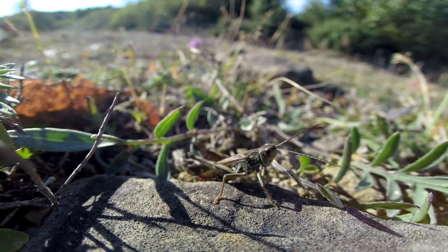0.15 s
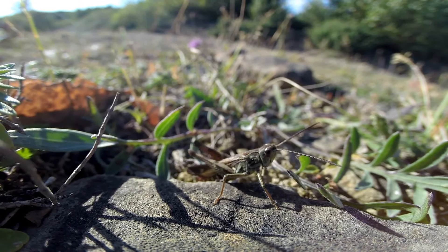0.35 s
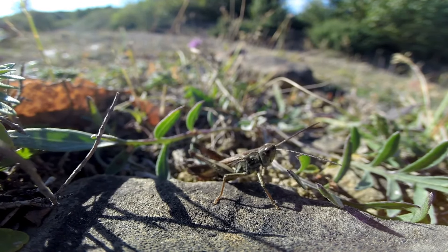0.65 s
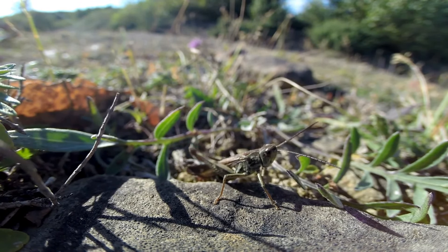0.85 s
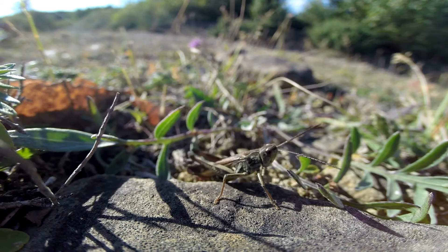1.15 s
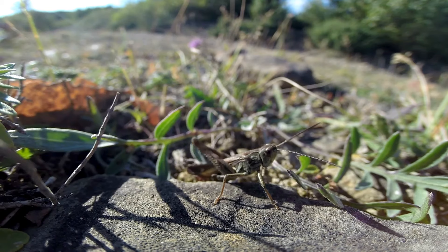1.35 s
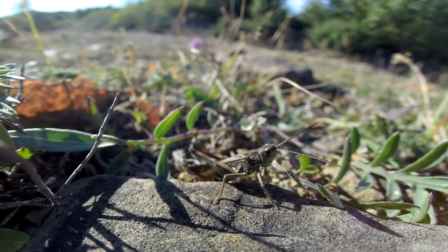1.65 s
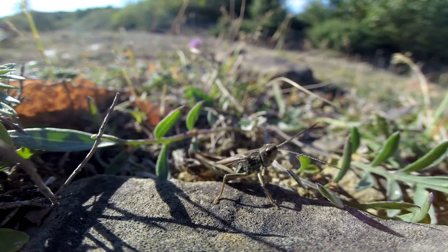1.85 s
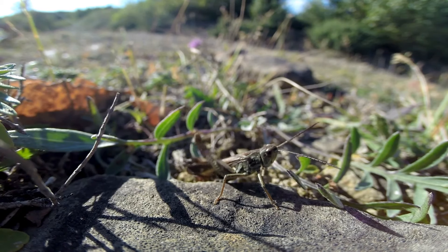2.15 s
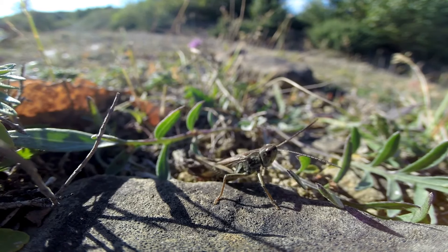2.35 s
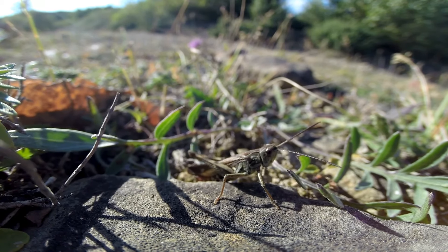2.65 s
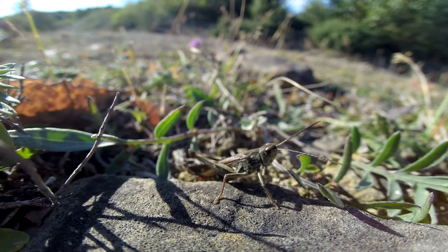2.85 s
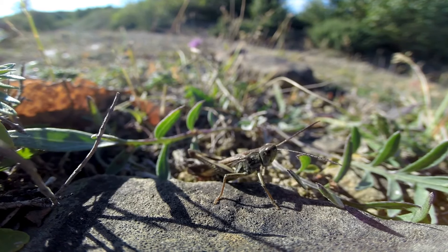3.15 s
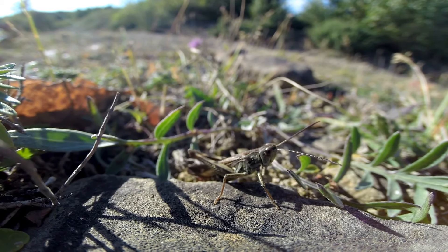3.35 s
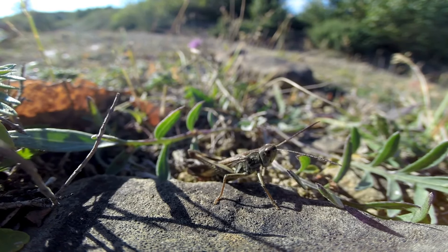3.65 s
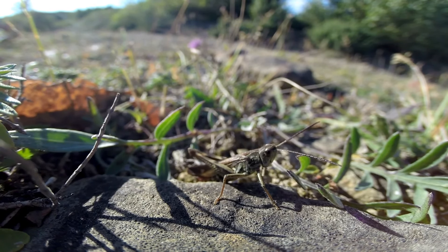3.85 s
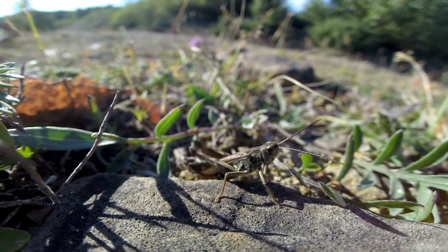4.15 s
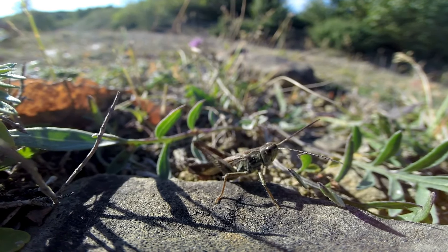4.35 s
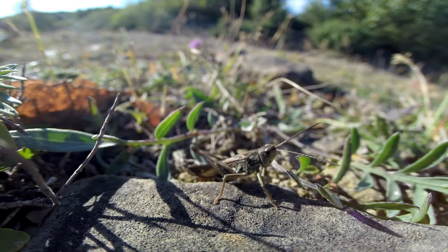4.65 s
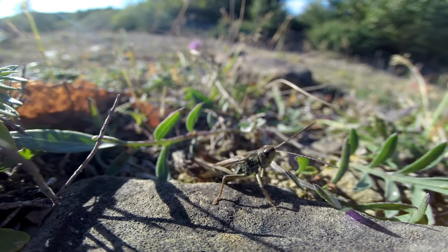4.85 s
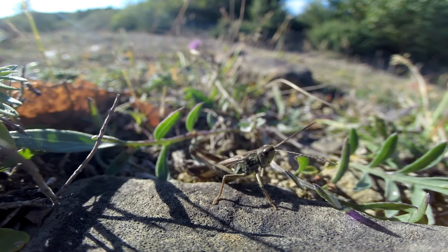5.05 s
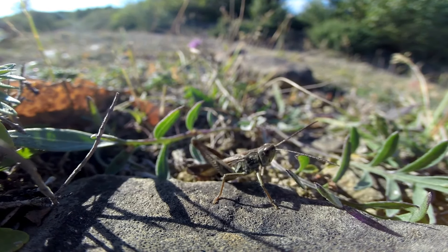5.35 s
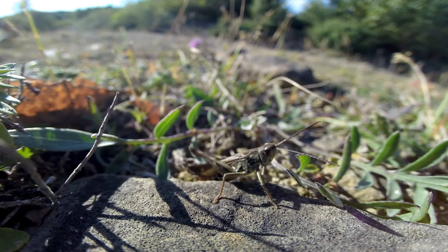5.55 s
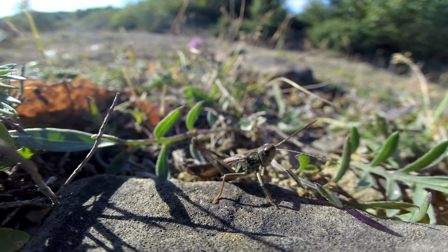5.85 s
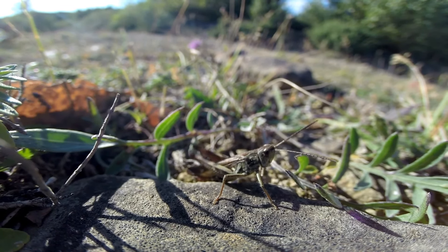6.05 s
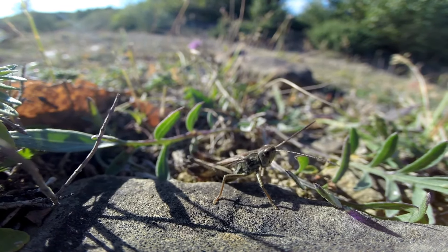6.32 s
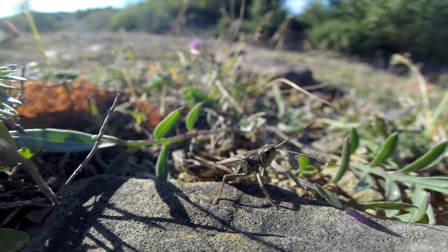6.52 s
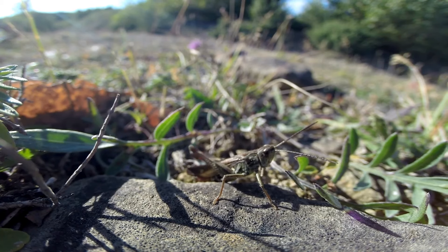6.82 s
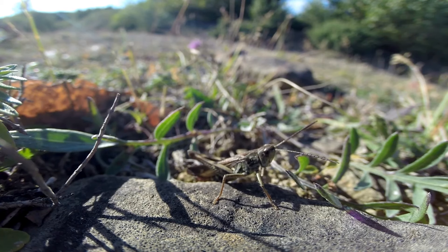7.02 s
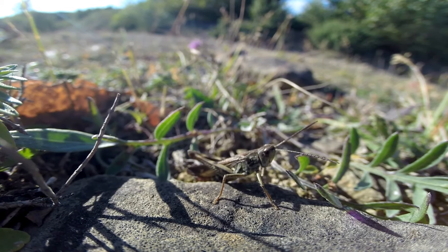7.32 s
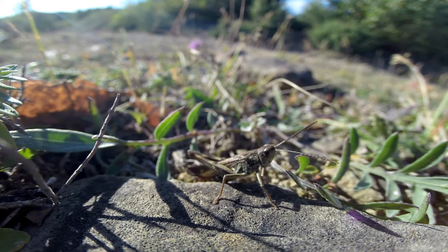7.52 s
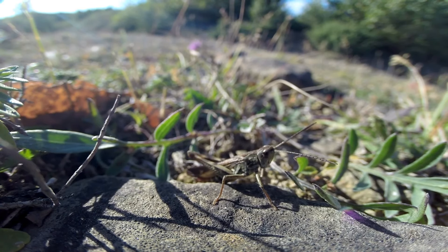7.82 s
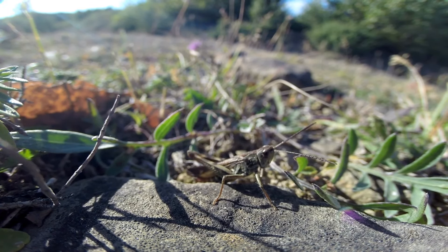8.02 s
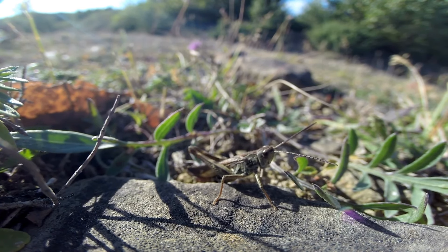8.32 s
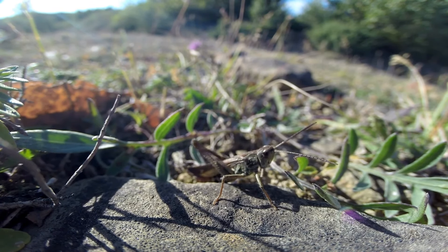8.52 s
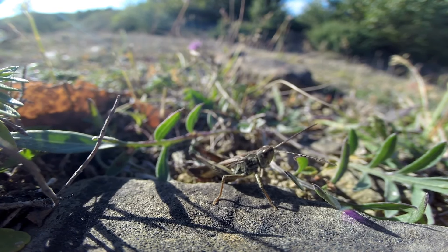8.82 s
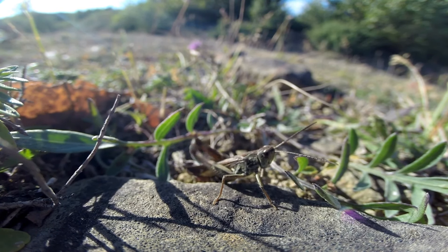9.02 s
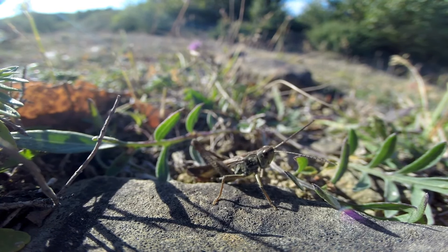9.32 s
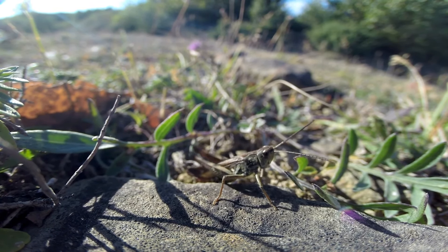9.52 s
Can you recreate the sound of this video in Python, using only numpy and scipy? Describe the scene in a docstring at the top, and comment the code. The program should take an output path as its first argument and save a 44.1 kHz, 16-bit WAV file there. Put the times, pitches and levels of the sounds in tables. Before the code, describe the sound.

Close, dry insect stridulation: fast pulsing chirr that rises from faint ticking to bright buzz, stops, and repeats over a very soft outdoor rush.

```python
"""A grasshopper sings three swelling bouts of about 11 leg strokes a second, by stridulation: the pegs of both
hind legs click over the wing veins, up to thousands of times a second, and each click rings the wing.
Each stroke is a jerk, a shiver and a slow ticking glide. Around it lies the soft rush of an open hillside,
made of filtered noise, and a far bird gives thin rising whistles, made of frequency-modulated sines."""
import sys
import numpy as np
from scipy import signal
from scipy.fft import rfft, irfft
from scipy.io import wavfile

SR = 44100
rng = np.random.default_rng(int(sys.argv[2]) if len(sys.argv) > 2 else 0)


def dump(signal):
    """Clip the signal to [-1, 1] and save it as 16-bit WAV at the path in sys.argv[1]."""
    limited = np.clip(np.atleast_2d(signal).T, -1, 1)
    pcm = np.round(limited * 32767).astype(np.int16)
    wavfile.write(sys.argv[1], SR, pcm)


N = 426886  # length in samples


def undb(db):
    """A decibel is a twentieth of a decade of amplitude."""
    return 10 ** (np.asarray(db) / 20)


def level(x, db):
    """Scale a sound to a root-mean-square level."""
    rms = np.sqrt(np.mean(x ** 2) + 1e-20)
    return x * undb(db) / rms


def along(at, table):
    """Linear interpolation of every further column of a table over its first."""
    first, *columns = np.transpose(table)
    return [np.interp(at, first, column) for column in columns]


def walk(n, rate):
    """Band-limited chance: random points, `rate` a second, joined by lines, with a spread near 1."""
    at = np.arange(n) / SR * rate
    count = int(at[-1]) + 2
    return 1.2 * np.interp(at, np.arange(count), rng.standard_normal(count))


def response(points, size):
    """Gain at each Fourier bin of a (frequency_hz, level_db) spectrum, interpolated over log frequency."""
    hz, db = np.transpose(points)
    bin_hz = np.arange(size // 2 + 1) * SR / size
    return undb(np.interp(np.log(bin_hz + 1), np.log(hz), db))


def ring(points, size=256):
    """Minimum-phase impulse response: folding the cepstrum makes the ring causal."""
    cepstrum = irfft(np.log(response(points, size)))
    cepstrum[1:size // 2] *= 2
    cepstrum[size // 2 + 1:] = 0
    return irfft(np.exp(rfft(cepstrum)))


def strokes(start, end):
    """Rhythm of one bout as (start_s, stop_s, jerk_db, surge); a stroke lasts until the next or the bout's end."""
    # runs of evenly paced strokes, parted by a skip in the beat or a change of attack:
    # first_stroke_s, last_stroke_s, jerk_db (opening jerk over the shiver), surge (extra speed share in the jerk)
    runs = [(-.014, -.014, -6.5, 0.56), (.075, .15, 6.5, .55), (.219, .575, 8, .6), (.645, 1.002, 6, 0.62),
            (1.101, 1.804, 5.5, 0.66), (1.892, 2.158, 3.5, 1.05), (2.247, 2.518, 5.5, 1.1),
            (2.619, 2.619, 10, .7), (2.687, 2.861, 8, 0.69), (4.139, 4.138, 13, 0.45),
            (4.211, 4.724, 5, .75), (4.792, 4.792, 13, 0.64), (4.865, 5.287, 7.5, .6),
            (5.372, 6.05, 8, 0.57), (6.137, 6.4, 9, .8), (6.489, 6.76, 7, 0.79), (6.872, 6.872, 11, 0.81),
            (8.468, 8.468, 10, 0.46), (8.543, 8.88, 0.5, 0.65), (8.955, 9.369, 7.5, .55),
            (9.436, 9.436, 8.5, 0.57), (9.505, 9.667, 7.5, 0.58)]
    usual_stroke_s = .087
    rows = []
    for first, last, jerk_db, surge in runs:
        if start <= first < end:
            count = round(abs(last - first) / usual_stroke_s) + 1
            rows += [(s, jerk_db, surge) for s in np.linspace(first, last, count)]
    stops = [row[0] for row in rows[1:]] + [end]
    return [(s, stop, jerk_db, surge) for (s, jerk_db, surge), stop in zip(rows, stops)]


def pegs(hz, force, uneven, scatter_db, order=8):
    """Stridulation as an impulse train: each peg clicks a little early or late, hard or soft."""
    travel = np.cumsum(hz) / SR  # pegs passed so far
    count = int(travel[-1])
    chance = rng.standard_normal((count, 2))
    place = np.arange(count) + rng.random()
    jitter = np.interp(place, travel, uneven) * chance[:, 0]  # in peg spacings
    at = np.interp(place + jitter, travel, np.arange(len(hz)))
    whole = at.astype(int)
    size = force[whole] * undb(scatter_db * chance[:, 1])
    # windowed-sinc interpolation lets clicks fall between samples
    taps = whole[:, None] + np.arange(-order, order + 1)
    offset = taps - at[:, None]
    clicks = size[:, None] * np.sinc(offset) * np.sinc(offset / (order + 1))
    train = np.bincount(np.maximum(taps, 0).ravel(), clicks.ravel(), len(hz) + order + 1)
    return train[:len(hz)]


def leg(n, speed_hz, jerk_db, stall_db, lag, surge, uneven):
    """Leg speed sets the peg rate and pressure the click strength: a hard jerk, then strong and weak arcs by turns."""
    # course of one stroke: stroke_share, speed_ratio, press_db, jerk_share
    course = [(0, .9, 5, 0.44), (0.032, 1, 3.5, 0.98), (.08, 0.99, 4, 0.99), (0.135, 1, 4.5, 0.41),
              (0.218, 0.97, 6, .18), (0.359, 0.95, 4, 0.25), (.76, 0.89, 4.5, 0.22), (.83, .8, -2, 0.63),
              (0.869, .33, 3, 0.011), (1, .25, 5.5, 0)]
    shiver_hz, timing = 116, .07  # arcs per second, and their drift in arcs
    dip, slack_db, limp_db = .32, 5.5, 2.0  # between arcs: speed lost, level gained; strong against weak arcs
    wobble, vary, grip_db = .055, .04, 2.0  # chance in speed, fast and slower (log ratio), and in level
    smooth_hz, worst_stumble = 4500, 1.5  # peg rate of unit stumble, and limit of the stumble

    share = np.arange(n) / n - lag
    pace, press_db, jerk = along(share, course)
    arcs = share * n / SR * shiver_hz + timing * walk(n, 100)
    arc = np.sin(np.pi * arcs)
    slack = (1 - jerk / 2) * (1 - np.abs(arc))  # the jerk carries the leg through its pauses
    drag = wobble * walk(n, 450) + vary * walk(n, 60)
    driven_hz = speed_hz * pace * (1 + surge * jerk)
    hz = np.maximum(driven_hz * (1.07 - dip * slack) * np.exp(drag), 100)
    db = press_db + jerk_db * jerk + (slack_db - stall_db) * slack
    db = db + limp_db * arc + grip_db * walk(n, 650)
    # a slow leg catches its pegs less evenly, a fast one almost whistles
    stumble = np.minimum(smooth_hz / hz, worst_stumble)
    return pegs(hz, undb(db), uneven * stumble, scatter_db=0.5)


def grasshopper():
    """Source and resonator: two legs' clicks, a moment apart, convolved with the wing's ring, grow with effort."""
    # bouts, in which effort grows evenly from nothing to full, then holds: start_s, full_effort_s, end_s
    bouts = [(-1.35, 1.55, 2.958), (4.105, 5.55, 6.964), (8.44, 9.5, 9.755)]
    # ring of the wing after one peg: frequency_hz, level_db
    wing = [(300, -37), (1300, -19), (2100, -14.5), (2750, -12), (3400, -6), (4400, -3), (5300, -5),
            (6000, -6.5), (6600, -1.5), (7250, 2), (7800, 0.1), (8400, -1.5), (9500, -10), (12000, -17),
            (13500, -25), (15300, -32.5)]
    song_db, swell_power = -27.5, 1.085  # level at full effort; amplitude grows as this power of effort
    stroke_scatter_db, jerk_scatter_db = 0.32, 0.1  # no two strokes are quite alike
    # base pegs per second at no and at full effort, before the course of the stroke; bend of the rise
    slow_hz, fast_hz, speed_power = 1801, 4647, 0.97
    # a weak leg stalls between its arcs and ticks; the stall fades as this power of the missing effort
    weakest_stall_db, stall_power = 15, 3.6
    # far leg relative to the near one; the lag is a share of the stroke, before effort and chance
    far_db, far_lag, far_speed, far_surge, far_accent = -0.5, .028, .94, .55, 0.69

    out = np.zeros(N + 2 * SR)  # a spare second at each end
    click = ring(wing)
    for start, full, end in bouts:
        for s, stop, jerk_db, surge in strokes(start, end):
            n, first = int((stop - s) * SR), int(s * SR) + SR
            effort = min((s - start) / (full - start), 1)
            speed_hz = slow_hz + (fast_hz - slow_hz) * effort ** speed_power
            gain = effort ** swell_power * undb(song_db + stroke_scatter_db * rng.standard_normal())
            accent_db = jerk_db + jerk_scatter_db * rng.standard_normal()
            stall_db = weakest_stall_db * (1 - effort) ** stall_power
            near = leg(n, speed_hz, accent_db, stall_db, 0, surge, uneven=0.11)
            lag = far_lag * np.sqrt(effort) * rng.uniform(0.46, 1.6)
            far = leg(n, speed_hz * far_speed, far_accent * accent_db, stall_db, lag,
                      far_surge * surge, uneven=.1)
            sound = np.convolve(near + undb(far_db) * far, click)
            out[first:first + len(sound)] += sound * gain / np.std(sound[:n])
    return out[SR:SR + N]


def hillside(swell_db=0.18):
    """Broadband noise shaped by a falling spectrum: a low, even rush of distant air that barely swells."""
    # spectrum of the air, relative: frequency_hz, density_db (per Hz)
    air_spectrum = [(12, -11.5), (20, -16), (44, 0), (191, -6), (416, -12), (614, -14.5), (705, -15),
                    (788, -16.5), (932, -17), (1130, -19), (1870, -23), (9130, -38.5), (15500, -51.5)]
    noise = rng.standard_normal(N)
    air = irfft(rfft(noise) * response(air_spectrum, N), N)
    return level(air * undb(swell_db * walk(N, 1.9)), db=-51)


def bird(waver=0.0092, flutter_db=3):
    """Frequency and amplitude modulation: thin upward whistles flutter on their long way through the air."""
    # one whistle: time_s (from its start), pitch_hz, level_db (relative)
    whistle = [(0, 2570, -8), (.018, 2790, 3.5), (.042, 2860, 2), (.065, 3120, 2), (.1, 3500, -8),
               (.116, 4000, 1), (.135, 4400, 0), (.155, 4400, -8)]
    # each whistle's place: start_s, level_db
    whistles = [(3.175, -66), (7.135, -69), (8.39, -63)]
    out, n = np.zeros(N), int(whistle[-1][0] * SR)
    hz, shape_db = along(np.arange(n) / SR, whistle)
    for s, db in whistles:
        wavering_hz = hz * (1 + waver * walk(n, 200))
        tone = np.sin(2 * np.pi * np.cumsum(wavering_hz) / SR)
        first = int(s * SR)
        out[first:first + n] += tone * undb(db + shape_db + flutter_db * walk(n, 65))
    return out


def scene():
    """Superposition in one channel: the singer in front, air and bird behind."""
    return (grasshopper() + hillside() + bird())[None]


def record(dry, top_hz=15350):
    """Elliptic low-pass filtering: a steep edge removes the highest treble."""
    lowpass = signal.ellip(10, .2, 70, top_hz, fs=SR, output="sos")  # order, ripple dB, stopband dB
    return signal.sosfilt(lowpass, dry)


dry = scene()
out = record(dry)
dump(out)
```